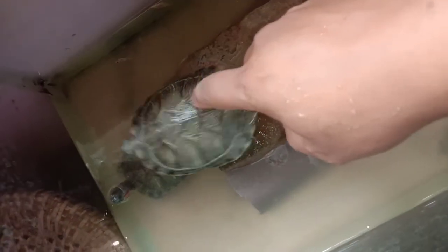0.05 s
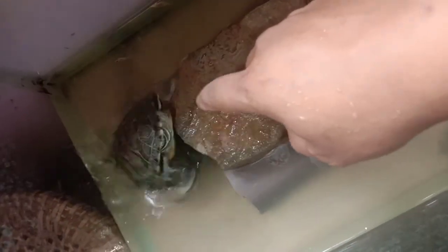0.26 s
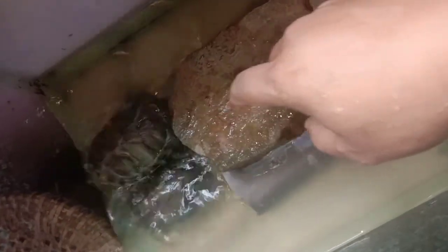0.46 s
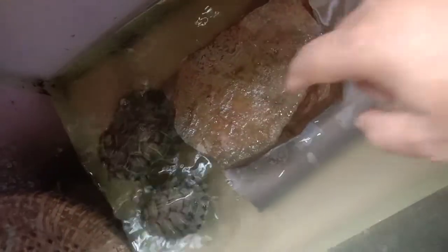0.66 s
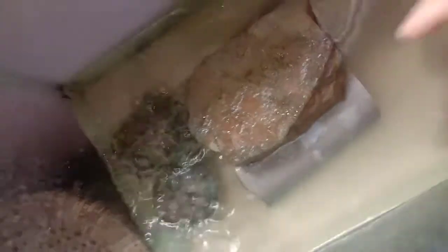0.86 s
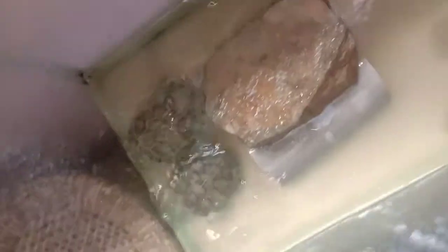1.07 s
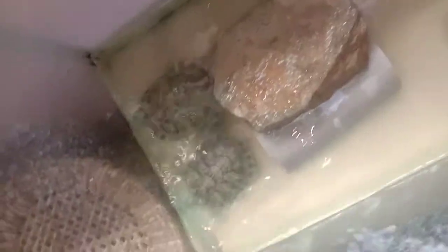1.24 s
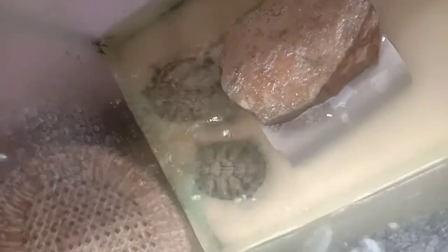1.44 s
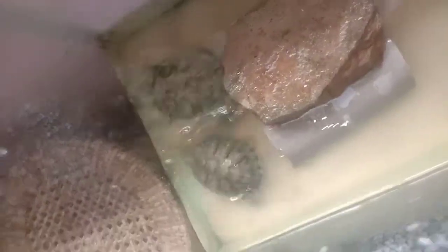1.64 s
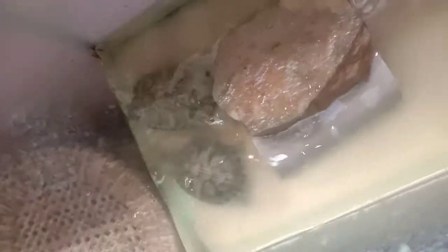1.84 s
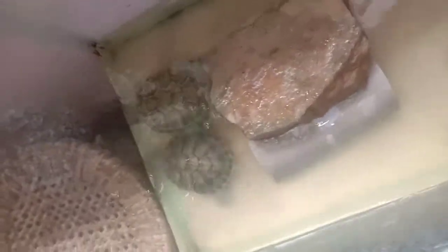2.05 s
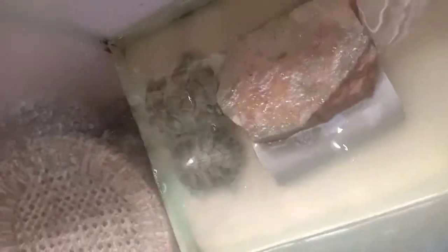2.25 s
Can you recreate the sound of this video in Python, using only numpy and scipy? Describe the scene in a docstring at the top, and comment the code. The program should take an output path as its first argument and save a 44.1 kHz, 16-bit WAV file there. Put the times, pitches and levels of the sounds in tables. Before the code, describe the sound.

A splash as a turtle drops into a shallow tank, then soft sloshes and drips.

```python
"""A splash in a shallow indoor tank: a turtle scrapes off a rock and drops in, close to the microphone.
The splash throws spray and bubbles; then the water sloshes and drips while the turtle bumps about.
Each push booms the tank, slaps ring its walls, trapped air gulps, and a small room answers."""
import sys
import numpy as np
from scipy import signal
from scipy.fft import rfft, irfft, next_fast_len
from scipy.io import wavfile
from scipy.ndimage import uniform_filter1d

SR = 44100
rng = np.random.default_rng(int(sys.argv[2]) if len(sys.argv) > 2 else 0)


def waveform_to_disk(signal):
    """Save audio, clipped to [-1, 1], as 16-bit WAV at the path in sys.argv[1]."""
    frames = np.transpose(np.atleast_2d(signal))
    scaled = np.clip(frames, -1, 1) * 32767
    samples = np.round(scaled).astype(np.int16)
    wavfile.write(sys.argv[1], SR, samples)


N = 101429

# shell and claws on rock: time_s, rasp_db, squeak_db
SCRAPE_LEVELS = [(0, -54, -41), (.04, -52.5, -43), (.06, -48.5, -42.5), (.09, -41.5, -43.5),
                 (.105, -47.5, -49), (.125, -85, -54), (.19, -158, -90), (.21, -110, -110)]
# scrape rasp: freq_hz, gain_db
RASP_SPECTRUM = [(300, -8.5), (1500, -15.5), (2500, -15), (4500, -9.5), (7500, -9.5), (10000, -15.5),
                 (15000, -24)]
# scrape squeak: freq_hz, gain_db
SQUEAK_SPECTRUM = [(500, -64), (1700, -8), (2100, 17), (2700, 20.5), (3200, 13), (4000, -34), (9000, -58)]
# fine spray and fizz: time_s, level_db
SPRAY_LEVELS = [(0, -57), (.186, -57.5), (.205, -31.5), (.23, -49), (.28, -50), (.31, -45), (.38, -55),
                (.47, -56), (.56, -59.5), (.65, -66), (.75, -65.5), (.88, -62.5), (1.1, -70), (1.24, -59.5),
                (1.5, -71.5), (1.9, -71), (2.06, -62.5), (2.3, -89)]
# water and shell pushing on the tank: start_s, boom_db, slap_db, decay_s
PUSHES = [(.005, -42.5, -81, 0.072), (0.057, -33, -80, 0.068), (0.12, -34.5, -40, 0.038),
          (0.144, -27.5, -33.5, 0.014), (0.203, -22, -17.5, 0.0074), (.22, -18.5, -25.5, 0.019),
          (0.253, -22, -22, 0.016), (.278, -17, -22.5, 0.011), (.313, -25.5, -44, 0.012),
          (.363, -28.5, -31, 0.0044), (0.427, -31, -22, 0.0068), (.485, -43.5, -45.5, 0.077),
          (0.59, -46.5, -44, 0.038), (0.646, -37.5, -42, 0.014), (0.681, -41.5, -49, 0.019),
          (0.791, -43, -49, 0.01), (0.848, -38, -39.5, 0.02), (0.903, -40.5, -51.5, 0.021),
          (0.946, -50, -63, 0.019), (1.014, -41.5, -58.5, 0.042), (1.135, -62, -50, 0.05),
          (1.174, -40, -52, 0.027), (1.222, -39, -41.5, 0.014), (1.395, -44, -58.5, 0.016),
          (1.581, -48.5, -48, 0.024), (1.666, -41.5, -49, 0.012), (1.769, -38, -42, 0.018),
          (1.795, -38, -41, 0.011), (1.953, -43, -46, 0.025), (2.089, -42.5, -48, 0.043),
          (2.16, -44.5, -51, .04), (2.198, -60, -45, 0.015), (2.286, -39, -36, 0.016)]
# low tank modes: freq_hz, gain_db, t60_s
TANK_MODES = [(138.8, -14, 0.35), (159.9, -7.5, 0.27), (214.6, -1, 0.25), (241.7, -6, 0.14),
              (280, -6, 0.22)]
# wall ringing: freq_hz, gain_db, t60_s
WALL_MODES = [(476.7, -2, 0.26), (642.4, -7.5, 0.32), (780, -1.5, 0.085), (960, -11, 0.2),
              (1251.3, 1.5, 0.29), (1277, -1, 0.25), (1526.5, 0.5, 0.1), (1996, -8, 0.14)]
# dead thud of a push: freq_hz, gain_db
THUD_SPECTRUM = [(30, -42), (55, -10), (110, 8.5), (200, 19.5), (280, -5), (360, -25), (800, 3),
                 (2000, -66)]
# surface slap: freq_hz, gain_db
SLAP_SPECTRUM = [(100, -52), (350, -4.5), (550, 2), (850, 3.5), (1300, 3), (2000, 3.5), (3200, -12),
                 (7000, -78), (16000, -110)]
# air pockets under shell and rock: start_s, peak_db, pitch_hz, swell_s
AIR_POCKETS = [(0.041, -42, 216, 0.013), (0.059, -45, 148.5, 0.037), (0.068, -42, 98, 0.014),
               (0.111, -34.5, 166, 0.0096), (0.207, -31, 970, 0.003), (0.209, -19.5, 212.3, 0.02),
               (.278, -17, 247, 0.0067), (.278, -13.5, 924, 0.0012), (.301, -30, 211.7, 0.027),
               (.362, -39, 228, 0.0063), (.429, -24, 1130, 0.00074), (.429, -31, 775, .005),
               (0.429, -34, 280, 0.0096), (0.486, -42.5, 208, 0.02), (0.601, -41.5, 285.5, .01),
               (.649, -40.5, 798, 0.0028), (.796, -44.5, 272, 0.0089), (0.846, -33.5, 206.6, 0.003),
               (0.861, -45.5, 276.3, 0.013), (.902, -39.5, 830, 0.0018), (.925, -46, 145.5, 0.02),
               (1.175, -43, 760, 0.0022), (1.22, -33, 800, 0.0024), (1.225, -42.5, 649, 0.0077),
               (1.391, -45.5, 271, 0.0077), (1.6, -37.5, 208, 0.024), (1.605, -40.5, 158, 0.012),
               (1.772, -45, 773, 0.0053), (1.795, -36.5, 275, 0.0048), (1.966, -54, 275, 0.015),
               (2.248, -55, 658, 0.018)]
# drops and bursting bubbles: start_s, peak_db, pitch_hz, t60_s
DROP_HITS = [(0.1344, -27.5, 2013, 0.071), (0.194, -39, 6480, 0.035), (.201, -16, 4398, 0.037),
             (0.206, -26.5, 5860, 0.034), (.208, -15, 3040, 0.017), (.221, -32, 4300, 0.022),
             (.228, -12.5, 1956, 0.023), (.244, -21, 5300, 0.044), (0.244, -23, 4540, 0.062),
             (0.262, -28, 2830, 0.026), (.271, -30, 5430, 0.025), (.276, -18, 2900, 0.0092),
             (.291, -20, 1860, 0.051), (0.317, -35, 8270, 0.045), (.321, -25.5, 2260, 0.024),
             (0.331, -27.5, 7370, 0.046), (.357, -21, 1866, 0.065), (0.3594, -26.5, 3920, 0.017),
             (.3623, -21.5, 5730, 0.026), (.403, -26, 2933, .018), (.429, -26.5, 1566, 0.032),
             (0.434, -32.5, 4360, 0.026), (.5133, -41, 8430, 0.055), (.533, -44, 5970, 0.028),
             (.587, -43, 3800, 0.03), (0.6156, -38.5, 5880, 0.019), (0.649, -37, 1625, 0.038),
             (.679, -36, 2200, 0.028), (0.796, -42.5, 5910, 0.079), (0.8096, -36, 3200, 0.015),
             (0.847, -34.5, 2050, 0.03), (0.96, -44.5, 5720, 0.11), (1.0057, -51, 5310, 0.082),
             (1.149, -39, 4830, 0.036), (1.193, -35.5, 5730, 0.0097), (1.192, -39.5, 4120, 0.013),
             (1.219, -38.5, 2210, 0.034), (1.3242, -42, 5650, 0.036), (1.403, -49, 5500, 0.14),
             (1.6598, -39.5, 2900, 0.0094), (1.66, -57, 5930, 0.011), (1.6993, -31.5, 1840, 0.022),
             (1.6997, -37.5, 4140, 0.0044), (1.699, -37.5, 5930, 0.008), (1.7346, -55, 2029, 0.15),
             (1.823, -51.5, 7470, .06), (2.043, -42.5, 2046, 0.066), (2.041, -43.5, 7080, 0.037),
             (2.1885, -49.5, 5950, 0.05), (2.2087, -42, 6000, 0.062), (2.259, -50.5, 7080, 0.34)]
# flung droplets on water and rock: start_s, peak_db, low_cut_hz, t60_s
SPATTER_HITS = [(.19, -29, 920, 0.073), (.239, -27.5, 4500, .035), (.251, -32, 12300, 0.032),
                (0.259, -29, 5000, 0.017), (.278, -30, 3000, 0.045), (.329, -24, 11800, 0.023),
                (0.3628, -25.5, 4120, 0.025), (0.512, -39, 7500, .035), (.615, -41, 3900, 0.029),
                (.684, -52, 2500, 0.021), (1.148, -41, 4000, 0.049), (1.1925, -34, 3970, 0.034),
                (1.245, -42.5, 12100, .015), (1.659, -39.5, 5000, 0.012), (2.206, -42, 4440, 0.031)]
# droplet spatter: freq_hz, gain_db
SPATTER_SPECTRUM = [(500, -9), (2000, -5), (4500, 2.5), (7500, 1), (9500, -7.5), (13000, -15), (15000, -11)]
# sheets of water: start_s, level_db, swell_s
WASHES = [(0.209, -27.5, 0.006), (0.259, -30, 0.0079), (0.587, -52, 0.012), (0.623, -46, 0.0093),
          (0.679, -44, 0.0063), (.804, -51.5, 0.0053), (.888, -48.5, 0.009), (2.04, -49, 0.013),
          (2.13, -59, 0.04)]
# water hiss: freq_hz, gain_db
WASH_SPECTRUM = [(600, -19), (1300, 1), (2000, 6), (3000, 1.5), (5000, -7), (7500, -11.5), (10000, -27),
                 (15000, -35)]
# room decay: freq_hz, t60_s
ROOM_DECAY = [(150, 0.45), (1000, 0.44), (5000, 0.28), (12000, 0.16)]
# background noise: freq_hz, gain_db
FLOOR_SPECTRUM = [(25, -27), (60, -4), (130, -5), (220, -2.5), (400, -21.5), (760, -14.5), (1080, -21),
                  (1250, -1.5), (1420, -16), (2000, -13.5), (3500, -53), (7000, -25), (10000, -31),
                  (15000, -39)]
# microphone colour: freq_hz, gain_db
MIC_RESPONSE = [(30, -9.5), (300, 0), (1000, -5.5), (3000, -6.5), (6200, -1), (8500, -7), (11000, -7.5),
                (13500, -8.5), (15000, 6.5)]


def amp(db):
    """Decibels to gain."""
    return 10 ** (np.asarray(db) / 20)


def unit_rms(x):
    """Scale to rms 1."""
    return x / np.sqrt(np.mean(x ** 2) + 1e-20)


def unit_peak(x):
    """Scale to peak 1."""
    return x / np.abs(x).max()


def at_hz(points, hz):
    """Interpolate (freq_hz, value) points on a log axis."""
    knots_hz, values = np.transpose(points)
    return np.interp(np.log(hz + 1), np.log(knots_hz + 1), values)


def curves(rows):
    """One per-sample curve for each column after time_s."""
    time_s, *columns = np.transpose(rows)
    return [np.interp(np.arange(N) / SR, time_s, column) for column in columns]


def filtered(x, response):
    """Zero-phase filter with gain response(hz)."""
    size = next_fast_len(len(x) + 4096)
    return irfft(rfft(x, size) * response(np.fft.rfftfreq(size, 1 / SR)), size)[:len(x)]


def noise(spectrum, size):
    """Coloured noise, rms 1."""
    return unit_rms(filtered(rng.standard_normal(size), lambda hz: amp(at_hz(spectrum, hz))))


def flutter(knots_per_s, size):
    """Random piecewise-linear curve."""
    return np.interp(np.arange(size) * knots_per_s / SR, np.arange(size), rng.standard_normal(size))


def add(track, start_s, sound):
    """Mix a sound in at start_s."""
    i = max(0, round(start_s * SR))
    track[i:i + len(sound)] += sound[:max(0, N - i)]


def scrape(slips_per_s=350, rough_db=1):
    """Shell and claws slip unevenly over wet rock."""
    rasp_db, squeak_db = curves(SCRAPE_LEVELS)
    slip_db = rough_db * flutter(slips_per_s, N)
    rasp = amp(rasp_db + slip_db) * noise(RASP_SPECTRUM, N)
    squeak = amp(squeak_db + slip_db) * noise(SQUEAK_SPECTRUM, N)
    return rasp + squeak


def spray(bubbles_per_s=3500, centre_hz=4495, log_spread=0.628, decay_cycles=15, scatter_db=2.5):
    """A cloud of tiny ringing bubbles, loudest in the splash."""
    count, t = int(bubbles_per_s * N / SR), np.arange(SR // 60) / SR
    when, up, down, size = rng.random((count, 4)).T[:, :, None]
    hz = centre_hz * np.exp(log_spread * (up - down))
    gain = amp(-scatter_db * np.log(size + 0.021))
    envelope = np.exp(-t * hz / decay_cycles) * (1 - np.exp(-t / 0.001))
    bubbles = gain * envelope * np.sin(2 * np.pi * hz * t)
    index = (when * N).astype(int) + np.arange(len(t))
    cloud = np.bincount(index.ravel(), bubbles.ravel(), N)[:N]
    return amp(curves(SPRAY_LEVELS)[0]) * unit_rms(cloud)


def ring(drive, modes, blur_hz=5.8, scatter_db=5):
    """Driven modes: moving water detunes them; their levels vary with where a push lands."""
    t = np.arange(len(drive)) / SR
    steps = rng.standard_normal((len(modes), len(t))) * np.sqrt(2 * np.pi * blur_hz / SR)
    wander_rad = uniform_filter1d(np.cumsum(steps, axis=1), size=300, axis=1)
    response = np.zeros(len(t))
    for (hz, gain_db, t60_s), phase in zip(modes, wander_rad):
        envelope = amp(gain_db + scatter_db * rng.standard_normal() - 60 * t / t60_s)
        response += envelope * np.sin(2 * np.pi * hz * t + phase - phase[0])
    return signal.fftconvolve(drive, response)[:len(t)]


def sloshes(thud_db=-3, wall_db=2.5, rise_share=0.14):
    """Each push booms the tank and slaps the surface; the slaps ring the walls."""
    booms, slaps, t = np.zeros(N), np.zeros(N), np.arange(SR // 3) / SR
    for start_s, boom_db, slap_db, decay_s in PUSHES:
        fade = np.exp(-t / decay_s)
        push = fade * rng.standard_normal(len(t))
        boom = unit_peak(ring(push, TANK_MODES))
        thud = unit_peak(noise(THUD_SPECTRUM, len(t)) * fade * np.sqrt(t))
        add(booms, start_s, amp(boom_db) * unit_peak(boom + amp(thud_db) * thud))
        rise = 1 - np.exp(-t / (rise_share * decay_s))
        slap = unit_peak(noise(SLAP_SPECTRUM, len(t)) * fade * rise)
        walls = unit_rms(ring(slap, WALL_MODES)) * slap.std()
        add(slaps, start_s, amp(slap_db) * (slap + amp(wall_db) * walls))
    return booms, slaps


def gulps():
    """A trapped air pocket swells into a round tone and dies."""
    out, t = np.zeros(N), np.arange(SR // 3) / SR
    for start_s, peak_db, pitch_hz, swell_s in AIR_POCKETS:
        envelope = t * np.exp(-t / swell_s)
        add(out, start_s, amp(peak_db) * unit_peak(envelope * np.sin(2 * np.pi * pitch_hz * t)))
    return out


def drops(attack_s=0.00062, pitch_rise=0.049, splat_db=-2, splat_octaves=0.45):
    """A wet splat sets off a bubble whose pitch rises as it dies."""
    out, t = np.zeros(N), np.arange(SR // 6) / SR
    for start_s, peak_db, pitch_hz, t60_s in DROP_HITS:
        glide_hz = pitch_hz * (1 + pitch_rise * np.minimum(t / t60_s, 1))
        bubble = np.sin(2 * np.pi * np.cumsum(glide_hz) / SR)
        band = filtered(rng.standard_normal(len(t)),
                        lambda hz: 1 / (1 + (np.log2((hz + 1) / pitch_hz) / splat_octaves) ** 2) ** 2)
        splat = amp(splat_db) * unit_rms(band)
        envelope = amp(-60 * t / t60_s) * (1 - np.exp(-t / attack_s))
        add(out, start_s, amp(peak_db) * unit_peak(envelope * (bubble + splat)))
    return out


def spatters(attack_s=0.0012, rough_db=4, droplets_per_s=850):
    """Drops break into droplets with ragged wet cracks; finer droplets sound higher."""
    out, t = np.zeros(N), np.arange(SR // 10) / SR
    for start_s, peak_db, low_cut_hz, t60_s in SPATTER_HITS:
        burst = filtered(noise(SPATTER_SPECTRUM, len(t)), lambda hz: 1 - 1 / (1 + (hz / low_cut_hz) ** 8))
        ragged_db = rough_db * flutter(droplets_per_s, len(t))
        envelope = amp(ragged_db - 60 * t / t60_s) * (1 - np.exp(-t / attack_s))
        add(out, start_s, amp(peak_db) * unit_peak(burst * envelope))
    return out


def washes():
    """Sheets of water hiss over rock and shell, swelling and dying."""
    out, t = np.zeros(N), np.arange(SR // 3) / SR
    for start_s, level_db, swell_s in WASHES:
        envelope = unit_peak(t * np.exp(-t / swell_s))
        add(out, start_s, amp(level_db) * envelope * noise(WASH_SPECTRUM, len(t)))
    return out


def room(x):
    """Diffuse tail; the treble dies first."""
    hz, t, bins = signal.stft(rng.standard_normal(SR * 2 // 3), SR, nperseg=256)
    t60_s = at_hz(ROOM_DECAY, hz)[:, None]
    tail = signal.istft(bins * amp(-60 * t / t60_s), SR)[1]
    return signal.fftconvolve(x, tail / np.linalg.norm(tail))[:N]


def scene(floor_db=-61, room_db=-13.5, low_send_db=0.5):
    """Turtle, water and tank in the room, over a quiet noise floor."""
    floor = amp(floor_db) * noise(FLOOR_SPECTRUM, N)
    booms, slaps = sloshes()
    low = booms + gulps()
    bright = slaps + drops() + spatters() + scrape() + washes() + spray()
    reverb = amp(room_db) * room(bright + amp(low_send_db) * low)
    return (low + bright + reverb + floor)[None]


def record(dry, low_cut_hz=66, top_hz=15600):
    """Low cut, microphone colour and band limit."""
    highpass = signal.butter(4, low_cut_hz, "high", fs=SR, output="sos")
    cut = signal.sosfilt(highpass, dry[0])
    return filtered(cut, lambda hz: amp(at_hz(MIC_RESPONSE, hz)) * (hz < top_hz))[None]


dry = scene()
out = record(dry)
waveform_to_disk(out)
```